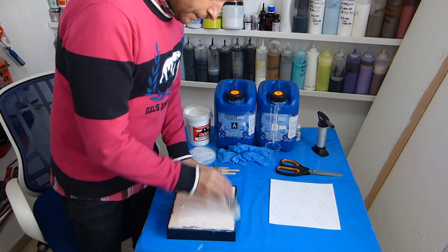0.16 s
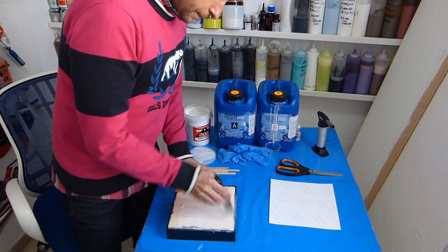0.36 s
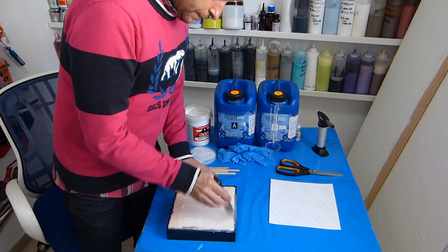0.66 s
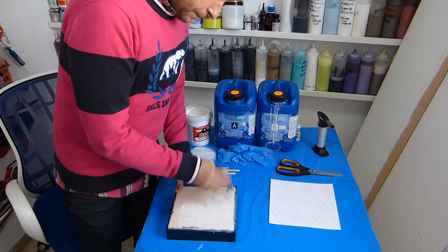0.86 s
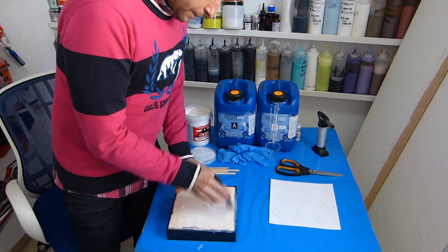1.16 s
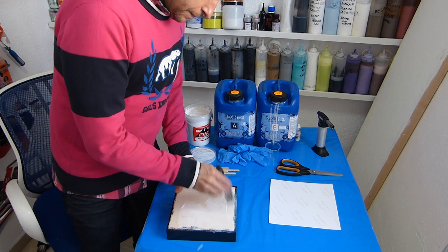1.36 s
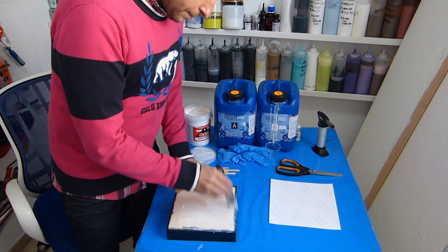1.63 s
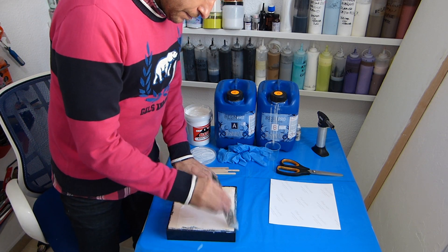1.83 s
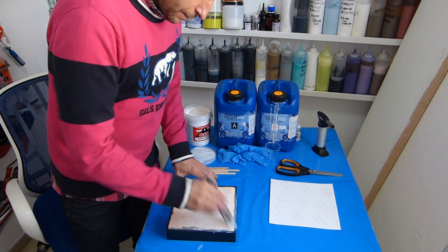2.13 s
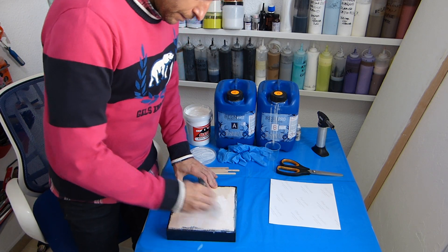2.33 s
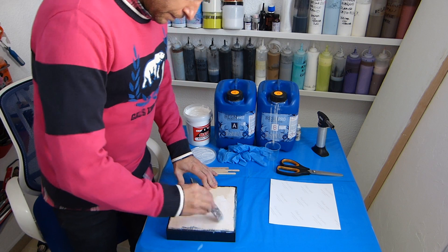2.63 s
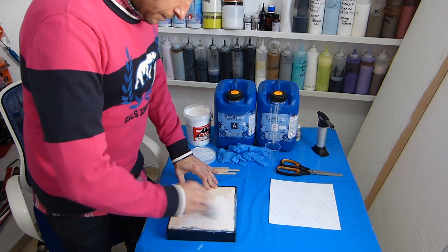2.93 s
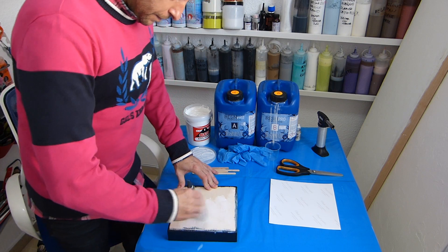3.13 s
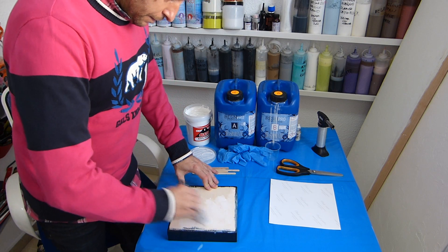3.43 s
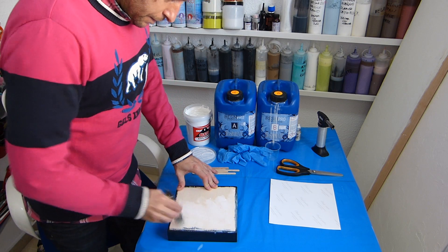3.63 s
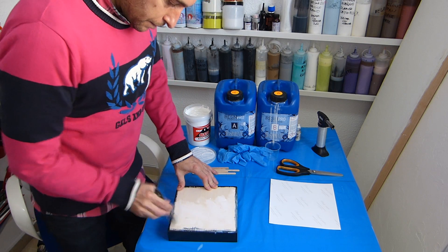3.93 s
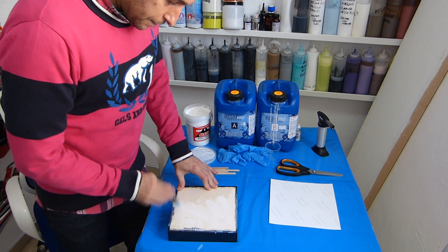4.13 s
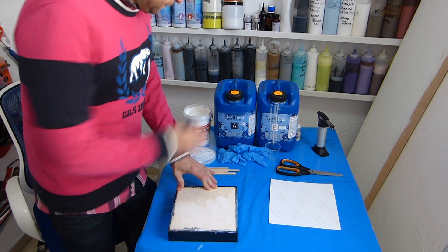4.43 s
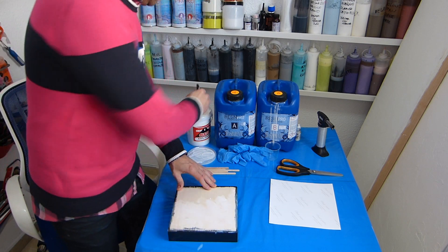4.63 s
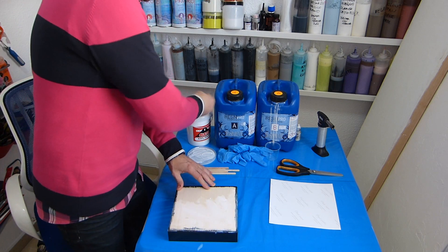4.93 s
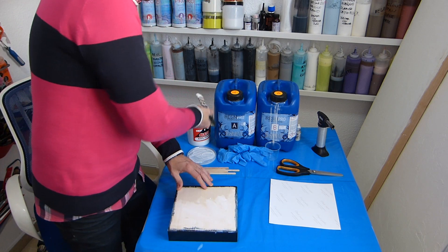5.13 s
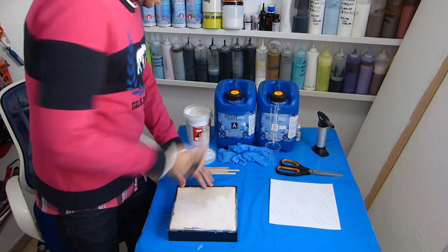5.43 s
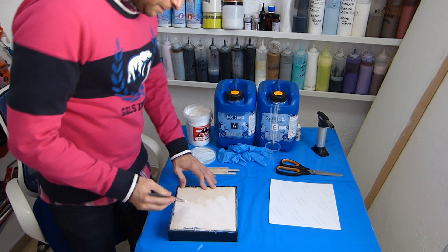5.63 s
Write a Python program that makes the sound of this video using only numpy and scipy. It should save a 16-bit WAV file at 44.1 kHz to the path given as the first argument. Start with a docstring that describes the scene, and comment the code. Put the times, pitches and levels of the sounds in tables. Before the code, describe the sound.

Light dry-sounding bristle hiss with a stickier mid-pitched drag beneath, brushing a thin panel on a table. Strokes start quickly, about two to four a second, with weak taps; a dull wooden thump comes midway, then brisk swipes and a tiny ping. The last second and a half is sparse, with faint creaky rubbing. Recorded fairly close at low level in a small craft room, soft noise floor.

```python
"""Glue brush on a wooden panel

A flat brush spreads glue over a wooden panel on a table in a small craft room.
Bristle tips slip in thousands of tiny clicks: they hiss in the air, drag in the glue and drive the
modes of panel and brush. The brush sweeps and lands in dabs; now and then the panel is knocked, and
one high ping sounds. Short echoes of the room follow, and a hush of filtered noise lies below."""
import sys
import numpy as np
from scipy import signal
from scipy.fft import rfft, irfft, next_fast_len
from scipy.io import wavfile

SR = 44100
rng = np.random.default_rng(int(sys.argv[2]) if len(sys.argv) > 2 else 0)


def log_audio(samples):
    """Write samples as a 16-bit WAV file to the path given in sys.argv[1]."""
    # one column per channel
    frames = np.atleast_2d(samples).T
    # limit to full scale, then quantise
    limited = np.clip(frames, -1, 1)
    pcm = np.round(limited * 32767).astype(np.int16)
    wavfile.write(sys.argv[1], SR, pcm)


def amp(db):
    return 10 ** (np.asarray(db, float) / 20)


N = 254348   # length in samples


def rms_one(x):
    """Scale to rms 1."""
    return x / np.sqrt(np.mean(x ** 2) + 1e-20)


def at_hz(points, hz):
    """Read a spectrum table on a log-frequency axis."""
    table_hz, values = np.transpose(points)
    return np.interp(np.log(hz), np.log(table_hz), values)


def drift(rate_hz):
    """Slow random wander of rms about 1: noise through two equal low-pass poles at rate_hz."""
    # drawn at one fortieth of the sample rate, with 2000 steps to settle
    pole = np.exp(-2 * np.pi * rate_hz * 40 / SR)
    noise = rng.standard_normal(N // 40 + 2002)
    slow = signal.lfilter([1], [1, -2 * pole, pole * pole], noise)[2000:]
    return np.interp(np.arange(N) / 40, np.arange(len(slow)), rms_one(slow))


def ring(force, hz, t60):
    """A damped mode: a unit click sets a sine of height 1 ringing, down 60 dB after t60 seconds."""
    decay = amp(-60 / (t60 * SR))
    w = 2 * np.pi * hz / SR
    return signal.lfilter([0, np.sin(w)], [1, -2 * decay * np.cos(w), decay * decay], force + 1e-18)


SLIPS_PER_S = 6000


def slips(spread_db):
    """Bristle tips let go at random, with uneven strength and either sign; rms 1."""
    strength = amp(spread_db * np.minimum(rng.exponential(1, N), 5))
    signs = rng.choice([-1, 1], N)
    lets_go = rng.random(N) < SLIPS_PER_S / SR
    return rms_one(strength * signs * lets_go)


# tilt of the stereo image: (frequency [Hz], left over right [dB])
LEAN = [(60, -15.5), (240, 3), (950, -1), (3760, 1.5), (15000, 1)]


def stereo(mid, side, hz, likeness):
    """Mix two unrelated draws to the likeness and lean of their pitch."""
    alike = np.clip(at_hz(likeness, hz), -1, 1)
    half_lean_db = at_hz(LEAN, hz) / 2
    image = np.sqrt(1 + alike) * mid + np.sqrt(1 - alike) * side * [[1], [-1]]
    return amp(np.array([[half_lean_db], [-half_lean_db]])) * image


# stereo width of brush and panel: (frequency [Hz], left-right likeness [-1 to 1])
LIKENESS = [(40, 1), (150, 1), (400, 0.057), (1000, 0.05), (2500, 0.63), (5000, 0.85), (9000, 0.45),
            (15000, 0.21)]


def coloured(make, spectrum, patchy_db, flicker_hz, likeness=LIKENESS):
    """Third-octave bands of a stereo source, each with its own level and flicker; rms 1."""
    out = 0
    edges = 25 * 2 ** (np.arange(29) / 3)
    sources = [[make(), make()] for k in range(2)]   # neighbouring bands get unrelated draws
    for k, (low, high) in enumerate(zip(edges, edges[1:])):
        hz = np.sqrt(low * high)
        if spectrum[0][0] < hz < spectrum[-1][0]:
            band = signal.butter(2, [low, high], "band", fs=SR, output="sos")
            mid, side = signal.sosfilt(band, sources[k % 2])
            gain = amp(at_hz(spectrum, hz) + patchy_db * drift(flicker_hz))
            out = out + gain * stereo(mid, side, hz, likeness)
    return rms_one(out)


# the brush resting and creeping on the glue between strokes:
# (time [s], bristle hiss level [dB], glue drag re hiss [dB], mode drive level [dB])
RUB = [(0.0, -49.5, -8, -55), (0.06, -56.5, -8, -60.5), (0.19, -64, -7, -63), (0.42, -59.5, -5, -67),
       (0.75, -61.5, -8.5, -66), (0.9, -60.5, -10, -70), (1.04, -67, -8, -72.5), (1.2, -66, -8, -69),
       (1.56, -64.5, -14, -71), (1.77, -66, -12, -68.5), (2.2, -66, -10, -70), (2.4, -59.5, -6.5, -64),
       (2.75, -62.5, -8, -63.5), (3.05, -62, -12, -64), (3.25, -69.5, -7, -66.5), (3.79, -57, -9, -69),
       (3.88, -62.5, -15, -65.5), (4.17, -68, -3, -70), (4.35, -57, -3.5, -67.5), (4.66, -57, -10, -63),
       (5.03, -59.5, -9.5, -69.5), (5.16, -66.5, -7, -71.5), (5.53, -59.5, -3.5, -67.5),
       (5.77, -61, -2, -65)]
RESTING_TIPS_DB = -9.5   # finest tips re the resting hiss
# sweeps of the brush: (time at full pressure [s], hiss level [dB], held time [s],
# glue drag re hiss [dB], finest tips re hiss [dB])
STROKES = [(0.11, -54.5, 0.0067, -4.5, -6), (0.239, -44.5, 0.037, -13.5, -4),
           (0.542, -50.5, 0.0067, -34, -1), (0.8, -62.5, 0.019, -3, -22), (1.09, -52.5, 0.03, -11.5, -8),
           (1.32, -62.5, 0.0083, -13, -4.5), (1.59, -63, 0.036, -2.5, -18), (1.81, -59, .01, -8.5, -14),
           (1.987, -55.5, 0.016, -5, -27), (2.256, -54, 0.017, -4, -29), (2.52, -53.5, 0.068, -7, -14),
           (2.81, -54.5, 0.01, -6, -13), (2.88, -58.5, 0.016, -4, -4), (3.068, -60.5, 0.0067, -0.5, -2),
           (3.14, -47, 0.0052, -10.5, -8.5), (3.29, -66, .01, -6, -20), (3.39, -53.5, .005, -22, -3),
           (3.5, -61.5, 0.017, -7.5, -8), (3.981, -44, 0.012, -8.5, -13), (4.093, -50, 0.004, -21, -31),
           (4.212, -50.5, 0.0076, -4.5, -31), (4.28, -49.5, 0.012, -7, -9), (4.69, -54, 0.06, -1.5, -23),
           (4.78, -61.5, 0.02, 7.5, -20), (5.51, -65, 0.0084, 2.5, -17), (5.62, -68, 0.0085, -9, -32)]
PRESS_DB_PER_S, LIFT_DB_PER_S = 410, 226   # how fast a sweep swells and fades
STROKE_DRIVE_DB = -15   # mode drive re the hiss of a sweep
# bristles landing all at once:
# (time [s], hiss level before attack and decay shape it [dB], glue drag re hiss [dB])
DABS = [(0.3915, -50, -4), (0.53, -45, -30), (0.8, -52.5, 1), (1.074, -51, -9), (1.809, -51.5, -3.5),
        (1.9748, -47.5, -4), (2.2442, -51.5, -6), (2.2794, -45.5, -5.5), (2.344, -52, -3),
        (2.3964, -62, 7.5), (2.505, -49.5, -6.5), (2.6162, -48, -7.5), (2.865, -56, 2.5),
        (3.1036, -43.5, -1), (3.273, -57.5, -0.5), (3.379, -48, -9), (3.9827, -42, -4.5),
        (4.094, -43.5, -4.5), (4.197, -40, -11.5), (4.237, -42, -3.5), (4.273, -54.5, 6),
        (4.6747, -48.5, -2), (5.603, -51, 0.5)]
DAB_ATTACK_S, DAB_T60_S = 0.0031, 0.16
DAB_TIPS_DB = -23   # finest tips re the hiss of a dab


def pressure():
    """Gains of hiss, drag, mode drive and tips: resting brush, sweeps and dying dabs, summed as power."""
    t = np.arange(N) / SR
    # amp(2 * dB) is power
    s, hiss_db, drag_db, drive_db = np.transpose(RUB)
    hiss, drag, drive = (amp(2 * np.interp(t, s, db)) for db in (hiss_db, hiss_db + drag_db, drive_db))
    tips = hiss * amp(2 * RESTING_TIPS_DB)
    for full, level_db, held, drag_db, tips_db in STROKES:
        press_db = PRESS_DB_PER_S * np.maximum(full - t, 0)
        lift_db = LIFT_DB_PER_S * np.maximum(t - full - held, 0)
        sweep = amp(2 * (level_db - press_db - lift_db))
        hiss = hiss + sweep
        drag = drag + sweep * amp(2 * drag_db)
        tips = tips + sweep * amp(2 * tips_db)
        drive = drive + sweep * amp(2 * STROKE_DRIVE_DB)
    for start, level_db, drag_db in DABS:
        age = np.maximum(t - start, 0)
        attack = 1 - np.exp(-age / DAB_ATTACK_S)
        decay = 1000. ** (-2 * age / DAB_T60_S)
        dab = attack * amp(2 * level_db) * decay
        hiss = hiss + dab
        drag = drag + dab * amp(2 * drag_db)
        tips = tips + dab * amp(2 * DAB_TIPS_DB)
    return np.sqrt([hiss, drag, drive, tips])


ECHO_S, ECHO_DB = 0.000799, -18.5


def with_faint_echo(x):
    """A very faint echo 0.8 ms late slightly ripples the spectrum of the hiss; rms 1."""
    late = [np.interp(np.arange(N) - ECHO_S * SR, np.arange(N), side) for side in x]
    return rms_one(x + amp(ECHO_DB) * np.array(late))


# colour of the bristle hiss: (frequency [Hz], level per Hz [dB])
BRISTLES = [(1530, -13.5), (2600, -9), (3080, -13), (3970, 8.5), (4390, 4), (4970, 0.5), (6630, 10),
            (10000, -13), (13000, -41), (22000, -120)]


def bristle_hiss(hiss):
    """The slips of the bristles hiss in the air."""
    slipping = coloured(lambda: slips(1.3), BRISTLES, patchy_db=2.0, flicker_hz=12.8)
    return hiss * with_faint_echo(slipping)


# colour of the finest bristle tips: (frequency [Hz], level per Hz [dB])
TIPS = [(7500, 19), (9500, -9), (11500, -13), (13500, -25), (15500, -40)]


def finest_tips(tips):
    """The finest tips slip in a thin, fast-flickering treble."""
    return tips * coloured(lambda: slips(1.1), TIPS, patchy_db=2.5, flicker_hz=25.0)


# colour of the glue drag: (frequency [Hz], level per Hz [dB])
GLUE = [(800, -11), (1300, -6), (1900, 0), (2500, -6), (3200, -4.5), (4500, -18)]


def glue_drag(drag):
    """Bristles drag in the glue: more uneven slips, lower in pitch and patchier than the hiss."""
    return drag * coloured(lambda: slips(3.7), GLUE, patchy_db=4.0, flicker_hz=13.0)


def radiated(x):
    """A small panel sends out no deep bass."""
    return signal.sosfilt(signal.butter(6, 125, "high", fs=SR, output="sos"), x)


# modes of the panel, and a 4090 Hz ring of the brush's ferrule or handle; rubbed here and struck
# below, before tilt and damping: (frequency [Hz], level [dB], free ring time to -60 dB [s])
MODES = [(123, -11, 0.1), (193.7, -2.5, 0.26), (283.3, -10, 0.27), (321, -3.5, 0.35), (383.2, 0, 0.16),
         (437, 0.5, 0.13), (488, 4.5, 0.036), (640, -5.5, 0.027), (732, 6, 0.035), (835.5, 0, 0.38),
         (878, -1, 0.055), (1009, 7, 0.037), (1011, 1, 0.074), (1203, 8, 0.041), (1323, 0.5, 0.54),
         (1395, 1.5, 0.22), (1510, -3.5, 0.18), (1626, -2, 0.23), (1890, -9, .35), (1930, -5, .6),
         (2128, 4.5, 0.064), (4090, 3, .1)]


def rubbed_modes(drive):
    """The slips shake every mode of the wet panel and the brush; glue and touch damp them."""
    sources = [[slips(4.05), slips(10.3)] for k in range(3)]   # close modes get unrelated draws
    out = 0
    for k, (hz, db, t60) in enumerate(MODES):
        mid, side = rms_one(ring(np.array(sources[k % 3]), hz, 0.39 * t60))
        tilted_db = db - 0.22 * hz / 100   # higher modes are shaken less
        out = out + amp(tilted_db) * stereo(mid, side, hz, LIKENESS)
    return drive * rms_one(radiated(out))


# colour of the room hush: (frequency [Hz], level per Hz [dB])
HUSH = [(15, -29), (25, -18), (39, -22), (55, -33), (64, -20.5), (409, -22), (507, -17.5), (993, -22.5),
        (2910, -27.5), (4850, -31), (7460, -30.5), (11800, -33), (15400, -82)]
# stereo width of the hush: (frequency [Hz], left-right likeness [-1 to 1])
HUSH_LIKENESS = [(40, 1), (150, 0.33), (500, 0.043), (1200, 0.033), (4000, 0.15), (10000, 0.36)]
HUSH_DB = -66.5   # rms level


def room_hush():
    """The hush of the room: noise in bands that wander slowly in level."""
    noise = coloured(lambda: rng.standard_normal(N), HUSH, patchy_db=3.5, flicker_hz=3.1,
                     likeness=HUSH_LIKENESS)
    return amp(HUSH_DB) * noise


# contacts that knock the panel, and a high ping at 4.238 s; those at 3.104 to 3.116 s form one big
# knock, 3.125 s its bounce: (time [s], peak level before mode weighting [dB], favoured pitch [Hz],
# spread [octaves], contact fade time [s])
CONTACTS = [(0.031, -53.5, 857, 0.29, 0.01), (0.105, -49.5, 317, 0.15, 0.0089),
            (.232, -54, 696, 0.33, 0.0079), (.26, -55, 830, 0.13, 0.11), (.39, -61, 2150, 0.43, .003),
            (0.456, -62, 2170, .3, 0.0024), (2.278, -58, 450, 0.25, .006), (2.35, -59, 447, 0.21, 0.02),
            (2.52, -57, 435, 0.21, 0.016), (2.873, -53, 422, 0.2, 0.015), (3.066, -62, 991, 1.3, 0.0056),
            (3.104, -50, 1310, 0.88, 0.013), (3.111, -29, 234, 0.53, 0.013), (3.116, -43, 624, 1, 0.02),
            (3.125, -50, 1370, 0.27, .012), (3.276, -62.5, 1320, 0.099, 0.0034),
            (3.763, -54, 387, 0.25, 0.0044), (4.092, -45, 1920, .15, .004), (4.238, -46.5, 4090, .2, 0.014),
            (4.244, -45.5, 370, 0.29, 0.0056), (4.281, -54.5, 780, 0.54, 0.019),
            (4.911, -64.5, 1510, 0.53, 0.0071), (5.501, -66.5, 1210, 0.37, 0.0036),
            (5.603, -52.5, 970, 0.48, 0.002), (5.679, -58.5, 800, 0.33, 0.018)]
HELD_RING_SHARE = 0.55   # of the free ring time, with brush and hand on the panel


def knocks_and_ping():
    """Each row is a rough contact favouring modes near its pitch; brush and hand damp the ring."""
    t = np.arange(SR // 3) / SR
    push_length = SR // 20
    out = np.zeros(N + len(t))
    roughness = rng.standard_normal((len(CONTACTS), len(MODES), push_length))
    for (start, peak_db, pitch_hz, octaves, contact), rough in zip(CONTACTS, roughness):
        at = round(start * SR)
        fading = np.exp(-t[:push_length] / max(contact, 0.0005))
        for (hz, db, t60), push in zip(MODES, rough * fading):
            force = np.pad(push, (0, len(t) - push_length))
            rung = ring(force, hz, t60 * HELD_RING_SHARE)
            near_db = -6 * (np.log2(hz / pitch_hz) / max(octaves, 0.05)) ** 2
            out[at:at + len(t)] += amp(peak_db + db + near_db) * rung / np.max(np.abs(rung))
    return radiated(out[:N])


ROOM_T60_S, WALL_CUT_HZ = 0.29, 3600   # ring time before the walls dull it; their low-pass corner


def room(x):
    """Six feedback delays a side, duller on every round."""
    size = next_fast_len(N + SR)
    w = 2 * np.pi * np.arange(size // 2 + 1) / size
    hz = w * SR / (2 * np.pi)
    dull = 1 / (1 + 1j * hz / WALL_CUT_HZ)
    thin = (hz / (hz - 250j)) ** 2   # light walls let the bass through
    out = np.zeros((2, len(w)), complex)
    for k, lag in enumerate(rng.uniform(0.008, 0.03, 12) * SR):
        loop = amp(-60 * lag / SR / ROOM_T60_S) * dull * np.exp(-1j * w * lag)
        out[k % 2] += loop / (1 - loop) * (-1) ** (k // 2)
    return irfft(out * thin * rfft(x, size), size)[:, :N]


def scene():
    """Brush and panel in the room, over the hush."""
    hiss, drag, drive, tips = pressure()
    brush = bristle_hiss(hiss) + finest_tips(tips) + glue_drag(drag) + rubbed_modes(drive)
    hush = room_hush()
    struck = knocks_and_ping()
    room_send = amp(-6.5) * struck + amp(-12.5) * brush.mean(axis=0)
    return brush + struck + room(room_send) + hush


def band_limit(x):
    """A steep low-pass at the top of the band."""
    return signal.sosfilt(signal.butter(12, 15560, fs=SR, output="sos"), x)


def record(dry):
    """The converter adds a small constant offset."""
    mix = dry - 0.00262
    return band_limit(mix)


dry = scene()
out = record(dry)
log_audio(out)
```